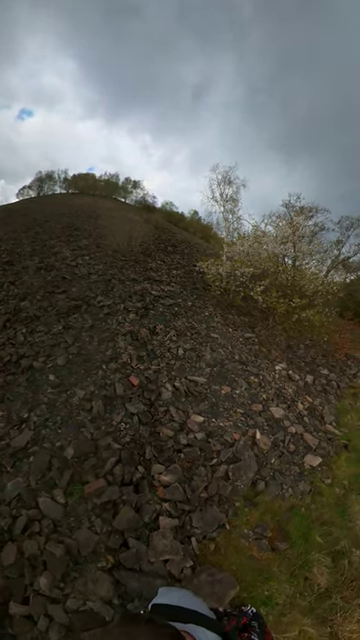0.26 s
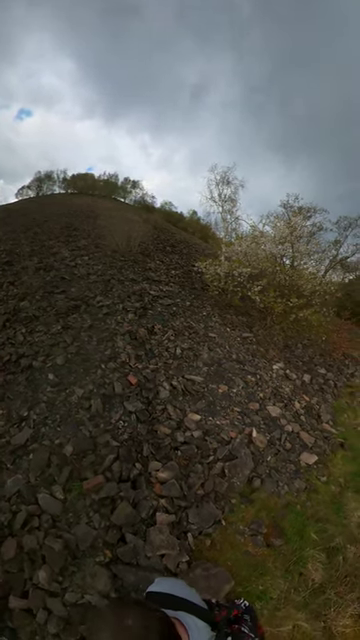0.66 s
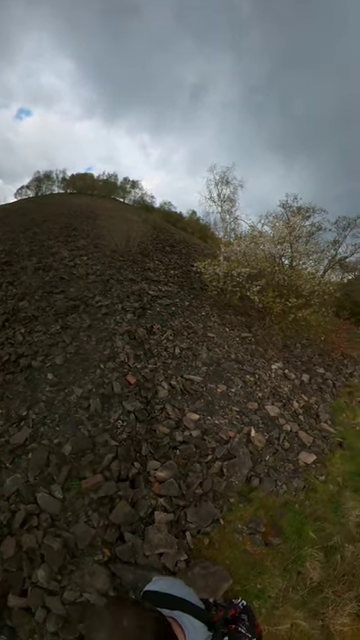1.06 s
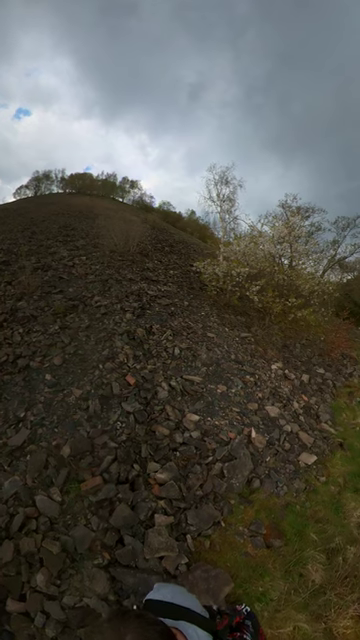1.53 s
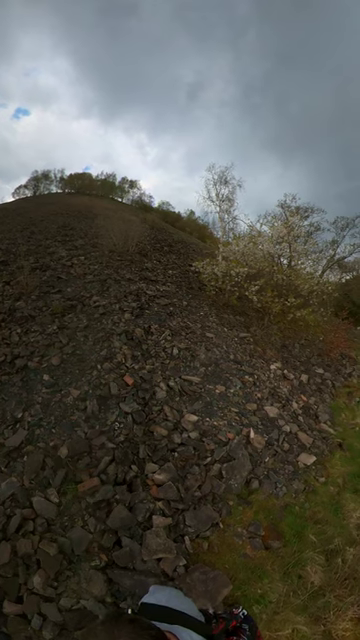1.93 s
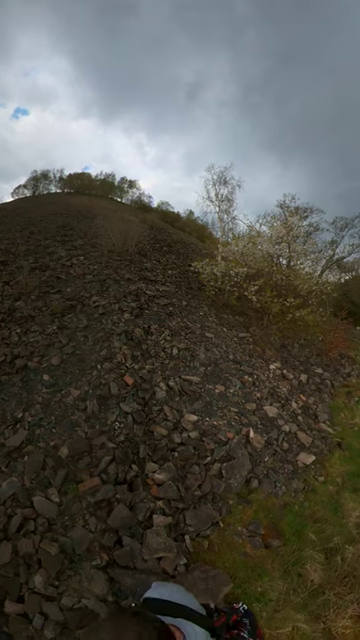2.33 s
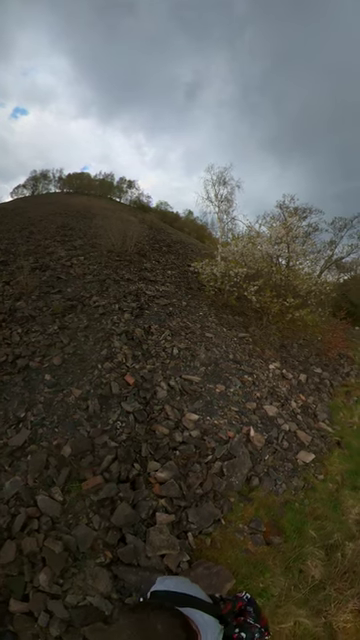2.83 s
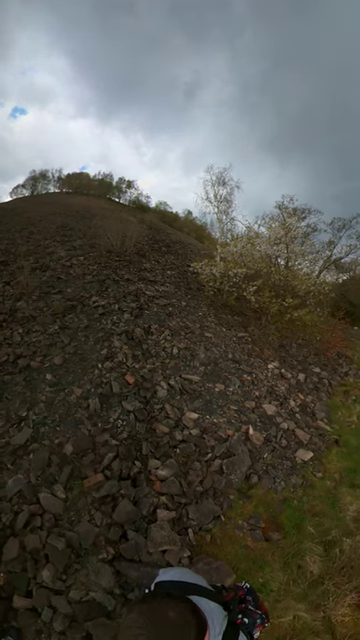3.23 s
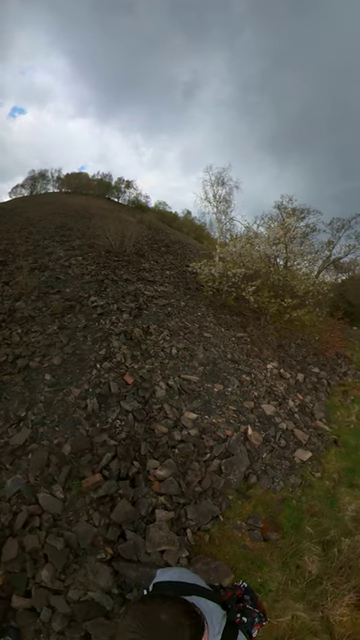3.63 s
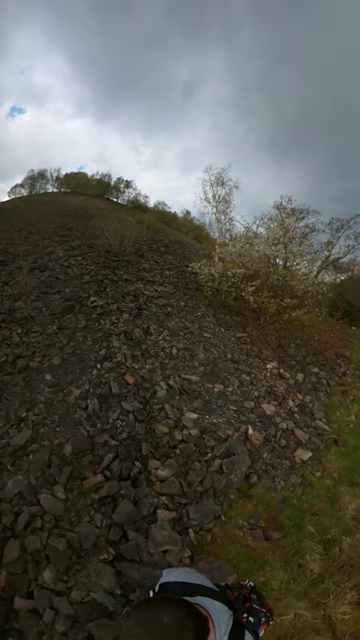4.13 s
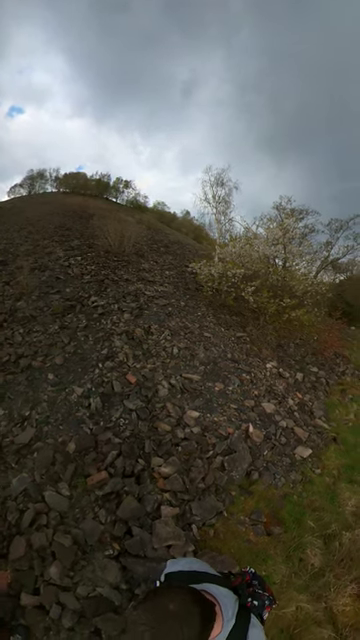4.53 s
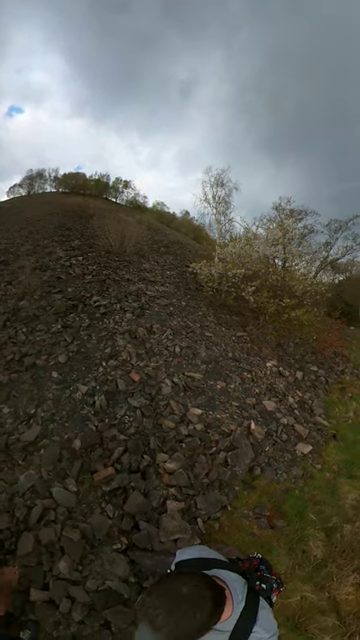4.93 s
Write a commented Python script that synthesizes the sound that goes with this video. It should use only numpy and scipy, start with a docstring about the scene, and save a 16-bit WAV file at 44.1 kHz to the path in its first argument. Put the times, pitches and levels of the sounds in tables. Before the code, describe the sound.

Sharp, dry hammer strikes on stone outdoors, a run, a pause, then another run, with faint bird whistles and low wind thumps.

```python
"""A steel hammer taps a rock on a scree slope in two runs of even blows: dying modes, grit noise and a low thud.
Loose stones clack after them on the rock's modes; thin chips ring single notes.
Birds whistle from the trees as gliding near-sines with echoes; the slope scatters blows, stones and whistles.
Shaped noise makes the wind buffeting a small camera microphone and the far hiss beneath."""
import sys
import numpy as np
from scipy import signal
from scipy.fft import rfft, irfft
from scipy.io import wavfile

SR = 44100
rng = np.random.default_rng(int(sys.argv[2]) if len(sys.argv) > 2 else 0)


def wrap_up_sound(samples):
    """Save the sound to the file named by the first command line argument, as 16-bit audio."""
    columns = np.atleast_2d(samples).T
    # keep every value between -1 and 1, then stretch to whole-number steps
    tamed = np.clip(columns, -1, 1)
    steps = np.round(tamed * 32767).astype(np.int16)
    wavfile.write(sys.argv[1], SR, steps)


N = 228417


def gain_of(db):
    """dB to amplitude gain."""
    return 10 ** (np.asarray(db) / 20)


def evened(x):
    """Scales to rms 1."""
    return x / np.sqrt(np.mean(x ** 2) + 1e-20)


def peaked(x):
    """Scales to peak 1."""
    return x / np.abs(x).max()


def read(points, hz):
    """Interpolates a table on a log-frequency axis."""
    f, value = np.transpose(points)
    return np.interp(np.log(hz + 1), np.log(f + 1), value)


def add(mix, start_s, sound):
    """Adds a sound in place; what falls outside the mix is dropped."""
    at = round(start_s * SR)
    sound = sound[max(-at, 0):]
    part = mix[max(at, 0):][:len(sound)]
    part += sound[:len(part)]


def coloured(points, size):
    """Gaussian noise with a given relative spectrum, rms 1."""
    hz = np.fft.rfftfreq(size, 1 / SR)
    spectrum = rfft(rng.standard_normal(size)) * gain_of(read(points, hz))
    return evened(irfft(spectrum, size))


def waver(size, width_hz):
    """Slow random gain of either sign, rms 1: spreads a line to a narrow band."""
    return coloured([(1, 0), (width_hz / 2, -3), (2 * width_hz, -40), (8 * width_hz, -90)], size)


def ring(modes, t, contact_s, pitch=1, detune=0.0035, spread_db=0.0):
    """Dying modes, peak 1, building up over the contact; pitch (by detune), level (by spread_db), phase random."""
    pitch_draws, level_draws = rng.standard_normal((len(modes), 2)).T
    phase_turns = rng.random(len(modes))
    body = np.zeros(len(t))
    for (hz, db, t60_s), a, b, turns in zip(modes, pitch_draws, level_draws, phase_turns):
        mode_hz = hz * pitch * (1 + detune * a)
        decay = gain_of(db + spread_db * b - 60 * t / t60_s)
        body += decay * np.sin(2 * np.pi * (mode_hz * t + turns))
    return peaked(body * (1 - np.exp(-(t / contact_s) ** 2)))


# scattering decay: f/Hz, t60/s (before the lasting factor)
SCATTER_DECAY = [(200, 0.4), (1000, 0.17), (3000, 0.17), (4500, .2), (6500, 0.2), (9000, .14)]


def scatter(x, start_s, lasting=1):
    """Diffuse reflections: sparse taps of random sign, fading in over start_s, each band dying at its own speed."""
    taps = np.zeros(SR // 2)
    at = np.arange(0, len(taps) - 20, 20)  # one tap per 20 samples
    taps[at + rng.integers(0, 20, len(at))] = rng.choice([-1., 1.], len(at))
    hz, t, bands = signal.stft(taps, SR, nperseg=128)
    t60_s = lasting * read(SCATTER_DECAY, hz)[:, None]
    tail = signal.istft(bands * gain_of(-60 * t / t60_s), SR, nperseg=128)[1]
    tail *= np.clip(np.arange(len(tail)) / SR / start_s, 0, 1) ** 2
    return signal.fftconvolve(x, tail / np.linalg.norm(tail))


# hiss spectrum, relative: f/Hz, level/dB
HISS_SPECTRUM = [(88, -26.5), (150, 1), (172, -12.5), (195, -4.5), (316, -5.5), (410, -9.5), (496, -11),
                 (560, -10), (739, -11.5), (792, -13.5), (1530, -23.5), (6330, -24), (9430, -42),
                 (12300, -90), (20700, -120)]
HISS_DB = -76


def hiss():
    """Far wind in the trees and microphone self-noise: shaped noise, swelling slightly."""
    swell_db = 1.5 * coloured([(.3, 0.5), (2, -9.0), (6, -49)], N)
    return gain_of(HISS_DB + swell_db) * coloured(HISS_SPECTRUM, N)


# steady wind between thumps, before the lumps: t/s, level/dB
WIND_LEVEL = [(0.0, -56.5), (1.08, -54.5), (1.31, -49.5), (1.96, -60), (2.08, -63.5), (3.35, -64.5),
              (3.63, -64.5), (4.34, -49.5), (4.54, -56), (4.69, -53), (4.92, -43), (5.18, -44)]
# buffeting spectrum, relative: f/Hz, level/dB
BUFFET_SPECTRUM = [(15, -5), (30, 3.5), (60, 4.5), (100, -1.5), (150, -24), (220, -35), (400, -66),
                   (900, -110)]
# single gusts thumping the microphone: centre t/s, envelope peak/dB, half-length/s
GUSTS = [(0.721, -45.5, 0.028), (0.896, -55, 0.019), (1.212, -50, 0.029), (1.293, -40, 0.011),
         (1.361, -37, 0.023), (1.69, -40, 0.017), (1.777, -38, 0.037), (1.999, -39.5, 0.023),
         (2.074, -43.5, 0.026), (2.468, -55.5, 0.034), (3.329, -48, 0.02), (3.529, -47, 0.021),
         (3.837, -54, 0.05), (3.984, -50, 0.011), (4.089, -42.5, 0.02), (4.289, -43, 0.05),
         (4.449, -36, 0.029), (4.598, -44.5, 0.013), (4.77, -32, 0.037), (4.863, -31, 0.0089)]


def wind():
    """Turbulence on the microphone: lumpy low noise plus gusts; strong gusts reach higher in frequency."""
    t = np.arange(N) / SR
    at_s, steady_db = np.transpose(WIND_LEVEL)
    lumps_db = 3.5 * coloured([(1, -5), (6, 5.5), (25, -3), (60, -48), (150, -90)], N)
    level = gain_of(np.interp(t, at_s, steady_db) + lumps_db)
    for centre_s, peak_db, half_s in GUSTS:
        level += gain_of(peak_db) * np.exp(-((t - centre_s) / half_s) ** 2)
    edge = coloured([(60, -28.5), (110, 7.5), (170, -9), (260, -24), (500, -51.5), (1000, -100)], N)
    edge_gain = gain_of(6.5) * level ** 0.51  # grows with the wind
    return level * (coloured(BUFFET_SPECTRUM, N) + edge_gain * edge)


def whistle(hz, db):
    """A near-sine along a pitch track; swells in unevenly and stops short."""
    u = np.arange(len(hz)) / len(hz)
    swell = np.minimum(u / .4, 1) ** 1.5 * np.minimum((1 - u) / .06, 1)
    swell *= 1 + .25 * waver(len(u), 60)
    return gain_of(db) * swell * np.sin(2 * np.pi * np.cumsum(hz) / SR)


# rising whistles: t at the top/s, rise/s, hold at the top/s, level/dB
RISING_NOTES = [(.712, 0.056, 0.023, -78), (1.555, 0.069, .003, -66.5), (2.934, 0.064, 0.016, -74.5),
                (3.233, .098, 0.0054, -61.5), (4.085, 0.028, .008, -75), (4.383, 0.1, 0.0035, -66.5),
                (4.947, 0.027, 0.0025, -88)]
BASE_HZ, CREEP_HZ_PER_S, FLICK_HZ, FLICK_S = 3150, 2500, 830, .016  # top = base + flick
# faint low notes from further off: t/s, length/s, f/Hz, level/dB
LOW_NOTES = [(2.765, .06, 1115, -83), (3.098, .045, 1155, -81)]
# echoes of the rising and low notes: delay/s, level/dB
TREE_ECHOES = [(.017, -16), (.024, -12), (.033, -9), (.048, -15)]


def rising_bird():
    """Pitch creeps up, flicks to a common top and holds; low notes join; tree echoes and scattering follow."""
    notes = np.zeros(N)
    for top_s, rise_s, hold_s, db in RISING_NOTES:
        left_s = np.maximum(np.arange(rise_s, -hold_s, -1 / SR), 0)
        hz = BASE_HZ - CREEP_HZ_PER_S * left_s + FLICK_HZ * np.exp(-left_s / FLICK_S)
        add(notes, top_s - rise_s, whistle(hz, db))
    for start_s, length_s, hz, db in LOW_NOTES:
        add(notes, start_s, whistle(np.full(round(length_s * SR), hz), db))
    out = notes + gain_of(-6) * scatter(notes, 0.0061, lasting=0.87)[:N]
    for delay_s, db in TREE_ECHOES:
        add(out, delay_s, gain_of(db) * notes)
    return out


# held whistles: t/s, length/s, start f/Hz, note f/Hz, level/dB, scoop/s
HELD_NOTES = [(4.562, 0.061, 3100, 4336, -62.5, 0.011), (4.863, 0.063, 3400, 4320, -68, .011)]


def held_bird():
    """Sines scooping up to a held note, from further off: long scattering behind them."""
    notes = np.zeros(N)
    for start_s, length_s, from_hz, note_hz, db, scoop_s in HELD_NOTES:
        t = np.arange(0, length_s, 1 / SR)
        hz = note_hz + (from_hz - note_hz) * np.exp(-(t / scoop_s) ** 2)
        swell = np.minimum(t / 0.024, 1) ** 2 * np.minimum((length_s - t) / 0.0073, 1)
        add(notes, start_s, gain_of(db) * swell * np.sin(2 * np.pi * np.cumsum(hz) / SR))
    return notes + gain_of(-4.5) * scatter(notes, 0.022, lasting=3.2)[:N]


# rock modes, low then main knock: f/Hz, level/dB, t60/s
ROCK_LOW = [(643.7, 11.5, 0.027), (430, -15.5, 0.0027), (864, -8.5, 0.045)]
ROCK = [(937, -1.5, 0.014), (1165.6, 3.5, 0.019), (1330, -11.5, 0.031), (1475, -16.5, 0.0061),
        (1810, -8, .015), (2074, -15.5, .015)]
# loose stones: t/s, knock peak/dB, pitch/rock pitch, brightness/(dB per octave)
STONES = [(0.052, -54, 1.08, -26), (0.315, -41.5, 1.1, -0.5), (0.565, -47, 1, 0), (0.856, -46.5, 0.97, -12),
          (1.112, -53.5, 0.92, -14.5), (1.379, -48.5, 1.07, 7.5), (1.539, -46, 1, -0.5),
          (1.612, -46, 0.905, 6), (1.623, -41.5, 1, -4.5), (1.639, -59, 1.02, 3), (1.679, -49.5, 0.95, -14),
          (3.97, -51, 0.92, -11.5), (4.242, -52, 0.84, -11), (4.508, -48, 0.83, -11)]


def stones():
    """Loose stones knock with the rock's modes, pitched and tilted, with a little grit and scattering."""
    out, t = np.zeros(N), np.arange(SR // 4) / SR
    for start_s, db, pitch, bright_db in STONES:
        modes = [(hz, mode_db + bright_db * np.log2(hz / 600), t60_s)
                 for hz, mode_db, t60_s in ROCK_LOW + ROCK]
        grit = coloured([(300, -18.5), (600, 5.0), (1800, bright_db), (2600, -29.5), (9000, -37.5)], len(t))
        grit *= gain_of(-60 * t / .025) * np.minimum(t / .0007, 1)
        knock = ring(modes, t, 0.0011, pitch, detune=0.0091) + gain_of(-6) * peaked(grit)
        tail = gain_of(-15.5) * scatter(knock, .008)[:len(t)]
        add(out, start_s, gain_of(db) * (knock + tail))
    return out


# thin chips ringing as they land: t/s, level before waver/dB, f/Hz, t60/s
CHIPS = [(0.314, -68, 3950, 0.022), (0.538, -48.5, 4300, 0.02), (1.348, -36, 2010, 0.032),
         (1.420, -68.5, 5520, 0.088), (1.428, -64, 2026, .1), (1.448, -69.5, 4370, 0.15)]


def chips():
    """Each chip rings one dying mode with a wavering level."""
    out, t = np.zeros(N), np.arange(SR // 4) / SR
    for start_s, db, hz, t60_s in CHIPS:
        note = ring([(hz, 0, t60_s)], t, .004, detune=0)
        add(out, start_s, gain_of(db) * note * (1 + 0.5 * waver(len(t), 70)))
    return out


# spectrum of the crack, relative: f/Hz, level/dB
CRACK_SPECTRUM = [(150, -41), (300, -3.5), (1200, -2.5), (2300, -15), (3200, -11.5), (4300, -11.5),
                  (5200, -6), (6600, -3), (7400, -7.5), (8200, -14), (9400, -26.5), (12000, -60)]


def crack_of(t):
    """Sharp crack, then grit, peak 1: noise with a fast first decay, then a weaker slow one."""
    fade = gain_of(-60 * t / 0.022) + gain_of(-12 - 60 * t / 0.062)
    return peaked(coloured(CRACK_SPECTRUM, len(t)) * fade * np.minimum(t / 0.00034, 1))


# heap under the rock: start f/Hz, t60/s, rise/s
THUD = (165, .055, .007)
THUD_SAG = .3  # share of pitch lost


def thud_of(t):
    """Low sine, peak 1, rising a moment after the blow; its pitch sags as the heap settles."""
    start_hz, t60_s, rise_s = THUD
    hz = start_hz * (1 - THUD_SAG * np.minimum(t / t60_s * 2, 1))
    envelope = gain_of(-60 * t / t60_s) * (1 - np.exp(-(t / rise_s) ** 2))
    return peaked(envelope * np.sin(2 * np.pi * np.cumsum(hz) / SR))


# slab and steel modes: f/Hz, level/dB, t60/s
SLAB = [(2300, 0, 0.035), (2060, -7.5, 0.044)]
STEEL_LOW = [(4320, -3.5, 0.032), (3855, -10, 0.016)]
STEEL_MID = [(6530, 1.5, 0.026), (6464, -0.5, 0.013), (5500, -21.5, 0.0083), (5060, -8.5, 0.012)]
STEEL_HIGH = [(6800, 0, .045), (7250, -10, .035), (7580, -10, .035), (8120, -9, .03)]
# wavering after-ring of low, mid, high steel: level re its ring/dB, t60/s, width/Hz
AFTER_RING = [(-38, .28, 80), (-27, .2, 400), (-31, .25, 70)]
# off the face of the slope: delay/s, level/dB
SLOPE_ECHOES = [(.025, -32), (.045, -35)]
DEEP_DB, DEEP_SHARE = -10.5, 0.4  # low knock, dB per dB of rock knock
TAIL_DB = -25.5
THUD_DB, THUD_SHARE = -28, 0.44  # thud, dB per dB of blow


def blow(peak_db, crack_db, rock_db, slab_db, low_db, mid_db, high_db):
    """Rock and steel ring, grit cracks, the heap thuds a moment later, the slope echoes and scatters."""
    t = np.arange(SR // 2) / SR
    near = gain_of(DEEP_DB + DEEP_SHARE * rock_db) * ring(ROCK_LOW, t, 0.0017)
    near += gain_of(rock_db) * ring(ROCK, t, .0011)
    near += gain_of(slab_db) * ring(SLAB, t, 0.00028)
    after = np.zeros(len(t))
    steel = zip([STEEL_LOW, STEEL_MID, STEEL_HIGH], [low_db, mid_db, high_db], AFTER_RING)
    for modes, db, (after_db, t60_s, width_hz) in steel:
        near += gain_of(db) * ring(modes, t, 0.00056, detune=0.002957)
        line = waver(len(t), width_hz) * np.sin(2 * np.pi * modes[0][0] * t)
        after += gain_of(db + after_db - 60 * t / t60_s) * line
    crack = gain_of(crack_db) * crack_of(t)
    tail = gain_of(TAIL_DB) * scatter(crack + 0.6 * near, 0.016)[:len(t)]  # crack spreads most widely
    near += crack
    out = near + after * np.minimum(t / 0.011, 1) + tail
    for delay_s, db in SLOPE_ECHOES:
        add(out, delay_s, gain_of(db) * near)
    return gain_of(peak_db) * out + gain_of(THUD_DB + THUD_SHARE * peak_db) * thud_of(t)


# blows (the first starts before zero, only its tail is left): t/s, reference level/dB, then level re that/dB
# of crack, rock knock, slab ring, low, mid, high steel ring
BLOWS = [(-.028, -12.5, -4, -22, -23, -31, -18, -25), (0.243, -14.5, -4.5, -7, -31.5, -23, -23, -29),
         (0.513, -12.5, -4.5, -4, -33.5, -24, -27, -32), (0.781, -9, -7, -11.5, -40, -12.5, -20.5, -12),
         (1.056, -12, -4, -12, -38, -15.5, -8, -16.5), (1.336, -17.5, -2.5, -14.5, -25, -2.5, -17.5, -28.5),
         (3.918, -18.5, -2.5, -27.5, -16, -29.5, -10.5, -17),
         (4.19, -12.5, -5, -14, -46, -38.5, -8.5, -14.5),
         (4.462, -12.5, -4.5, -7.5, -29.5, -39, -16, -14.5), (4.73, -11, -4, -10.5, -23, -16.5, -6.5, -18),
         (5.012, -12.5, -4.5, -14, -28, -7, -11.5, -13.5)]


def hammer():
    """Steel on rock: one struck sound per blow, each with its own mix of parts."""
    out = np.zeros(N)
    for start_s, *levels_db in BLOWS:
        add(out, start_s, blow(*levels_db))
    return out


def scene():
    """Everything at one microphone."""
    return (hammer() + stones() + chips() + rising_bird() + held_bird() + wind() + hiss())[None]


AHEAD_S, AHEAD_DB = .02, -29.0
ROLLOFF_HZ, EDGE_HZ = 8600, 9600


def record(dry):
    """A faint exact copy sounds 20 ms ahead of everything; treble rolls off; then the band limit."""
    lead = round(AHEAD_S * SR)
    early = np.pad(dry[:, lead:], ((0, 0), (0, lead)))
    both = dry + gain_of(AHEAD_DB) * early
    dull = signal.sosfilt(signal.butter(4, ROLLOFF_HZ, fs=SR, output="sos"), both)
    band_limit = signal.firwin(201, EDGE_HZ, window=("kaiser", 5), fs=SR)
    return signal.oaconvolve(dull, band_limit[None], "same")


dry = scene()
out = record(dry)
wrap_up_sound(out)
```